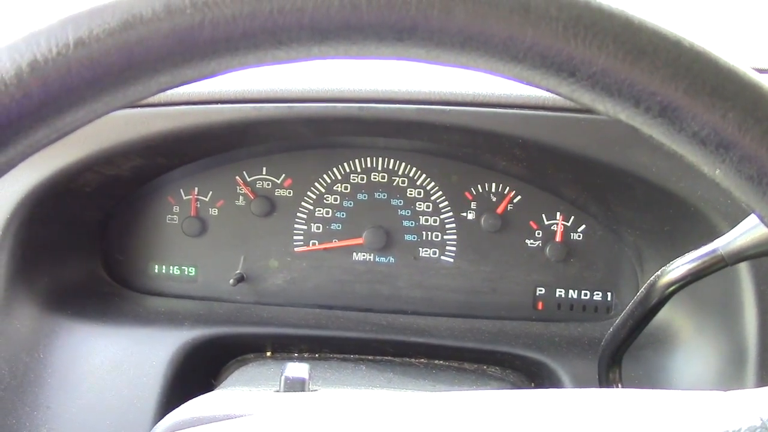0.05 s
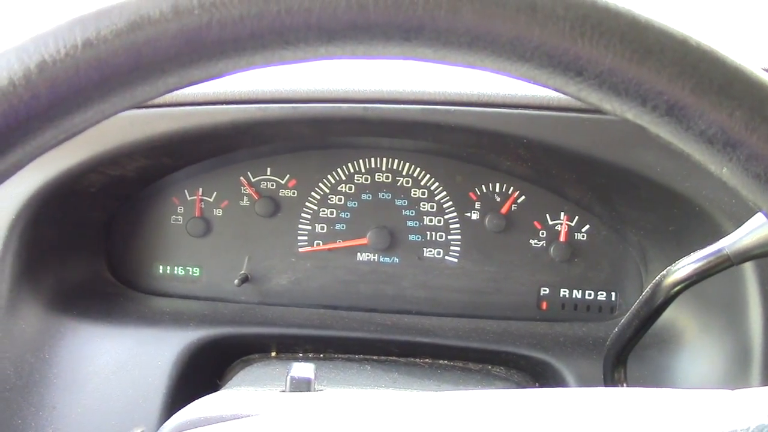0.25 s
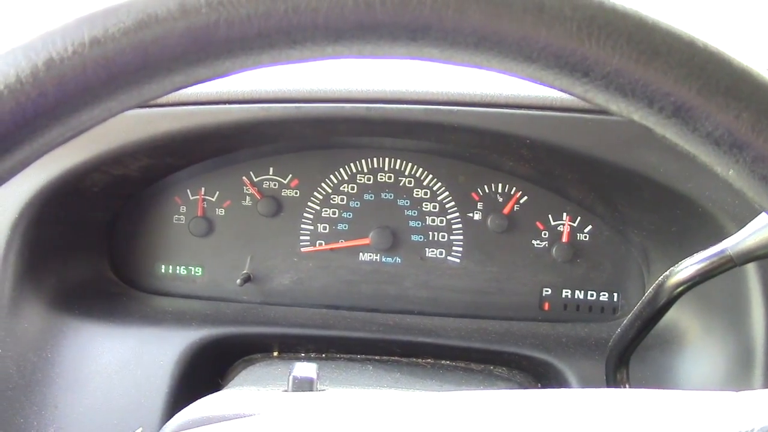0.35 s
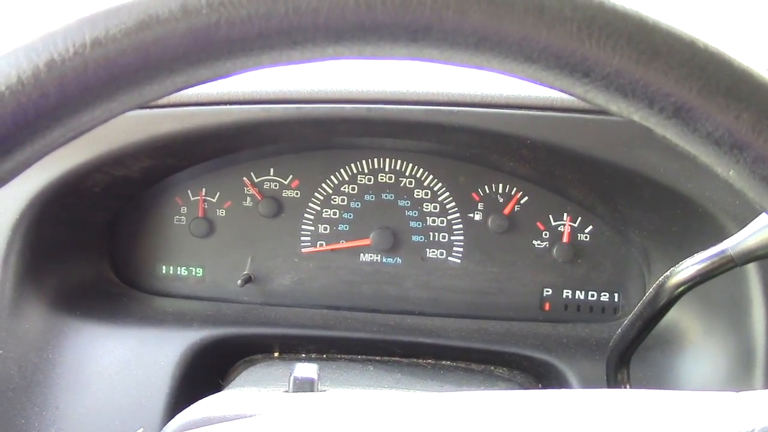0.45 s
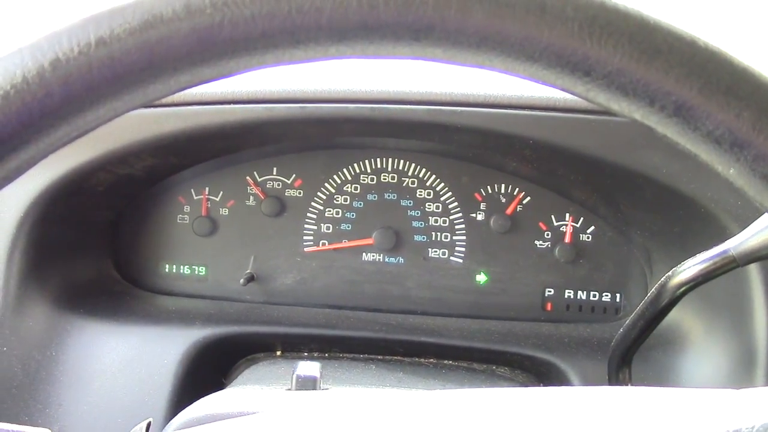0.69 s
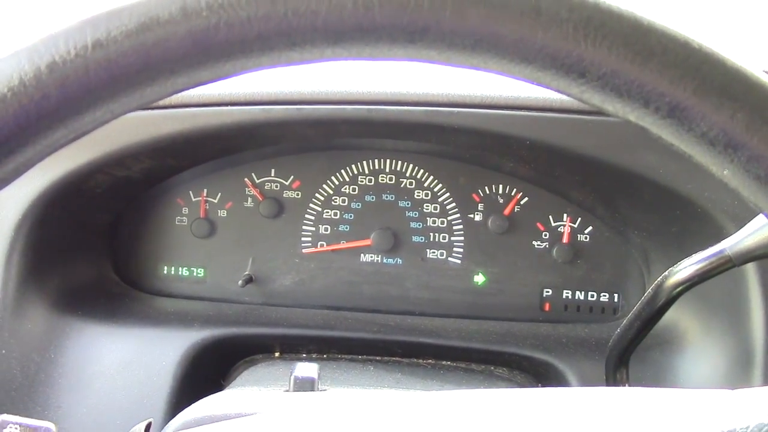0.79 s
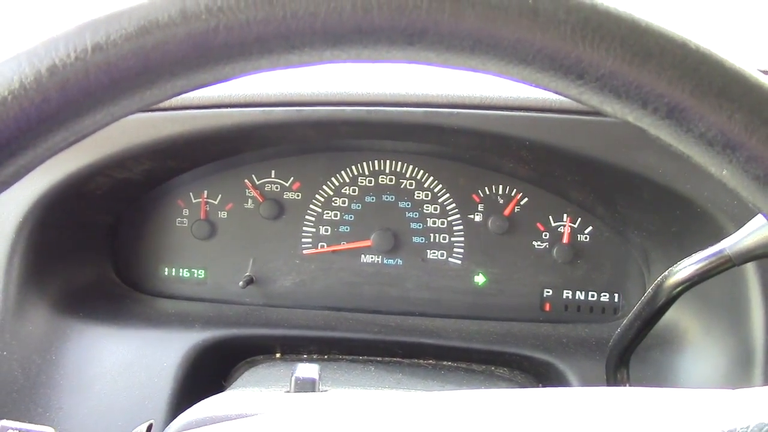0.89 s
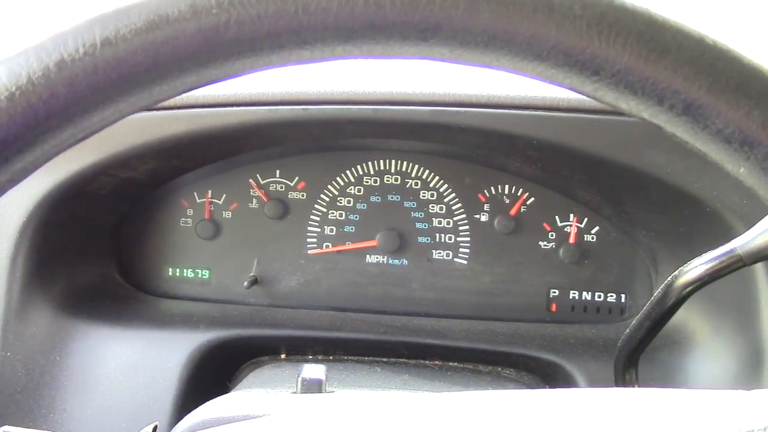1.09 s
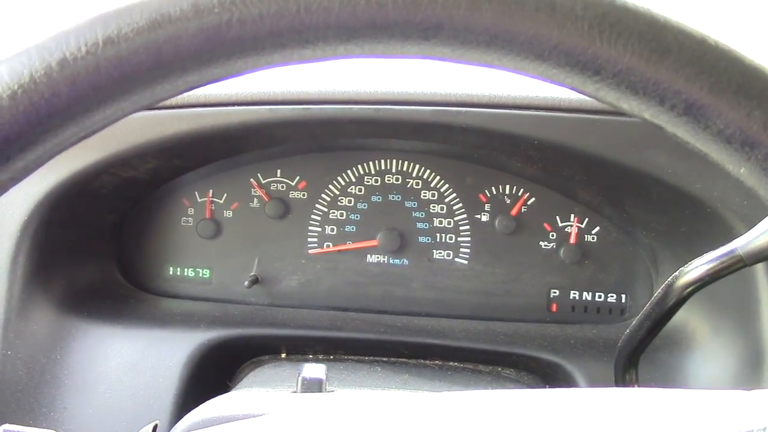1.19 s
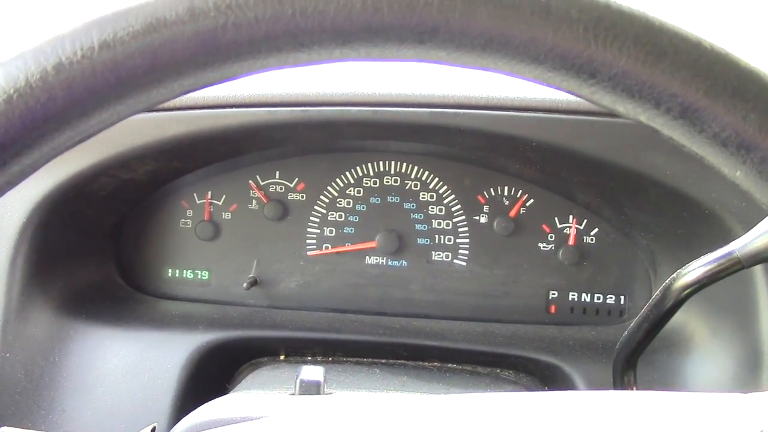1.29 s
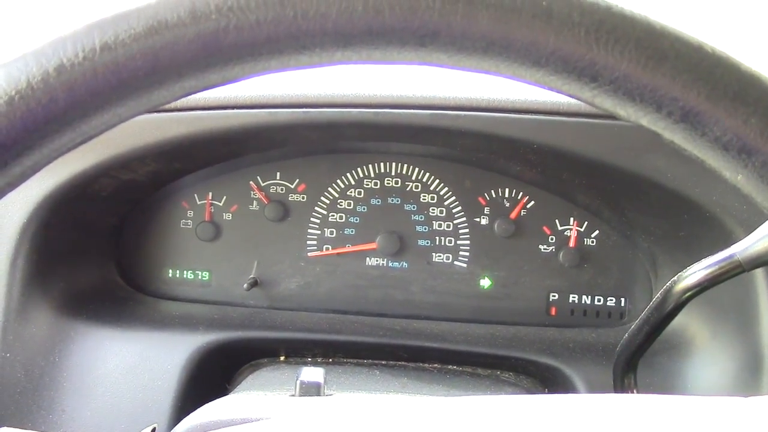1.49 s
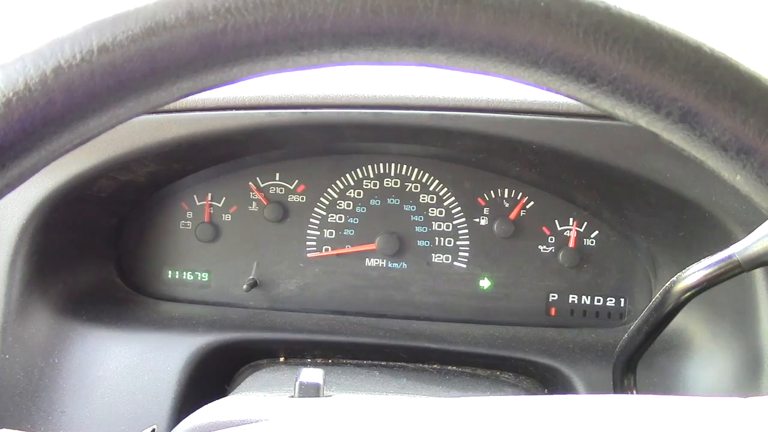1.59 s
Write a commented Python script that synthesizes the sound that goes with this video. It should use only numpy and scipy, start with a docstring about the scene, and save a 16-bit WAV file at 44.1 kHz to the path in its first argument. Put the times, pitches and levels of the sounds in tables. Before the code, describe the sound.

Close by in a small, padded vehicle cabin, a turn signal lever is flicked over: one loud clack, light clicks, and a duller second clack. A few faint relay ticks sound over a soft rush and low hum.

```python
"""A quiet steady rush and a low hum fill the small, padded cabin of a parked vehicle.
The turn signal lever snaps out of the left position and is pushed into the right one: its plastic
catch clacks in the steering column, the switch contacts click, and the flasher relay ticks under
the dash. Each hit is a short crack of noise, the ringing of the part and a brief cabin echo."""
import sys
import numpy as np
from scipy import signal
from scipy.fft import rfft, irfft
from scipy.io import wavfile
from scipy.ndimage import uniform_filter1d

SR = 44100
rng = np.random.default_rng(int(sys.argv[2]) if len(sys.argv) > 2 else 0)


def persist_wave(psi):
    """Save psi, clipped to +-1, as 16-bit WAV."""
    counts = np.round(np.clip(psi, -1, 1) * 32767).astype(np.int16)
    wavfile.write(sys.argv[1], SR, np.atleast_2d(counts).T)


N = 72765

# how alike a click is in the two ears: f/Hz, likeness (1 = the same)
CLICK_LIKENESS = [(200, 0.94), (700, .95), (1500, .8), (3100, 0.87), (6800, 0.46), (12000, 0.3)]


def amp(db):
    """Turns decibels into a factor to multiply by."""
    return 10 ** (np.asarray(db) / 20)


def value_at(curve, hz):
    """Looks up a curve at hz, joining its points on a log-frequency axis."""
    point_hz, values = np.transpose(curve)
    return np.interp(np.log(hz + 1), np.log(point_hz), values)


def pan(left_db):
    """Left and right gains, with the left louder by left_db."""
    return amp([[left_db / 2], [-left_db / 2]])


def noise_pair(likeness, size):
    """Frequencies and spectra of a left and a right white noise that are partly alike."""
    hz = np.fft.rfftfreq(size, 1 / SR)
    left, other = rfft(rng.standard_normal((2, size)))
    same = np.clip(value_at(likeness, hz), -1, 1)
    right = same * left + np.sqrt(1 - same ** 2) * other
    return hz, np.array([left, right])


def coloured(sound, gain_db):
    """Turns each frequency up or down without smearing sound ahead of a hit (minimum phase)."""
    cepstrum = irfft(np.log(amp(gain_db)))
    half = cepstrum.shape[-1] // 2
    cepstrum[..., 1:half] *= 2
    cepstrum[..., half + 1:] = 0
    return irfft(rfft(sound) * np.exp(rfft(cepstrum)))


def flattened(burst):
    """Evens out the broad spectrum of a burst and keeps its fine ripple."""
    power = uniform_filter1d(abs(rfft(burst)) ** 2, size=90, axis=-1)
    return coloured(burst, -10 * np.log10(abs(power) + 1e-12))


def cabin_air():
    """Shaped noise makes the steady rush, and one faint tone makes the low hum."""
    # tone colour of the rush: f/Hz, relative level/dB
    colour = [(25, -23), (43, -34), (59, -14), (123, -13), (161, -4), (205, -3), (291, 2), (361, -7),
              (449, -0.5), (600, 1), (680, -0.5), (750, -8), (905, -6), (1070, -4.5), (1280, -10.5),
              (1470, -6.5), (2460, -12), (4500, -14), (5300, -14), (6310, -15), (7500, -21.5),
              (9500, -22.5), (12500, -30), (15800, -41)]
    # how alike the rush is in the two ears: f/Hz, likeness
    likeness = [(40, 0.89), (200, .88), (600, 0.53), (1500, 0.3), (4000, 0.59), (12000, 0.29)]
    rush_db, hum_db, hum_hz = -51.5, -76.5, 71.6
    hz, noise = noise_pair(likeness, N)
    rush = irfft(noise * amp(value_at(colour, hz)), N)
    hum = np.sqrt(2) * np.sin(2 * np.pi * (hum_hz * np.arange(N) / SR + rng.random()))
    return pan(left_db=0.8) * (amp(rush_db) * rush / rush.std() + amp(hum_db) * hum)


def cabin_echo(t):
    """Many reflections blur into a short tail; the treble dies first."""
    # how long the cabin echoes: f/Hz, time to fade by 60 dB/s
    fade_times = [(250, 0.46), (700, 0.19), (2000, 0.067), (5000, 0.073), (12000, 0.044)]
    band_count, rise_s = 7, 0.0011
    hz, noise = noise_pair(CLICK_LIKENESS, len(t))
    centres = np.geomspace(200, 13000, band_count)
    tail = 0
    for centre_hz, weights in zip(centres, np.eye(band_count)):
        band = irfft(noise * value_at(list(zip(centres, weights)), hz))
        tail += band * amp(-60 * t / value_at(fade_times, centre_hz))
    return flattened(tail * (1 - np.exp(-t / rise_s)))


def strikes(hits, colour, tones, crack_fade_s, ring_db, echo_db):
    """Each hit cracks, rings the part and echoes. A fade is the time to fall by 60 dB."""
    crack_rise_s, ring_rise_s = 0.00015, 0.00039
    bass_hz, treble_hz, lowest_hz = 1080, 5040, 248
    size = 8192  # samples in one hit
    t = np.arange(size) / SR
    track = np.zeros((2, N + size))
    for start_s, level_db, bass_db, treble_db, extra_ring_db, extra_echo_db in hits:
        hz, noise = noise_pair(CLICK_LIKENESS, size)
        crack = flattened(irfft(noise) * amp(-60 * t / crack_fade_s) * (1 - np.exp(-t / crack_rise_s)))
        echo = amp(echo_db + extra_echo_db) * cabin_echo(t)
        hit = coloured(crack + echo, value_at(colour, hz))
        ring_onset = amp(ring_db + extra_ring_db) * (1 - np.exp(-t / ring_rise_s))
        for tone_hz, tone_db, fade_s in tones:
            # each ear gets the tone a little out of step
            shift = rng.standard_normal((2, 1)) * (1 - value_at(CLICK_LIKENESS, tone_hz)) / np.pi
            envelope = ring_onset * amp(tone_db - 60 * t / fade_s)
            hit += envelope * np.sin(2 * np.pi * (tone_hz * t + shift))
        bass_shelf = bass_db / (1 + (hz / bass_hz) ** 4)
        treble_shelf = treble_db / (1 + (treble_hz / (hz + 1)) ** 4)
        start = round(start_s * SR)
        track[:, start:start + size] += coloured(hit, level_db + bass_shelf + treble_shelf)
    # the hits carry almost no deep bass
    low_cut = signal.butter(6, lowest_hz, "highpass", fs=SR, output="sos")
    return signal.sosfilt(low_cut, track[:, :N])


def lever():
    """The lever's catch rides over a bump and slaps home in the steering column housing."""
    # hits of the catch: t/s, level/dB, bass/dB, treble/dB, extra ring/dB, extra echo/dB
    hits = [(.2422, -27.5, 12.5, -6, -18, 14), (.2461, -12.5, -3, 13, 4.5, 3), (.2513, 3, -13, -2, -2, -3),
            (.2545, -1.5, -1.5, 5, 6, 0), (.2590, -3, 4.5, 3.5, -17.5, -1),
            (.7308, -13, 11, -5.5, -0.5, -0.5), (.7338, -11.5, -3.5, -4.5, 3.5, -1),
            (.7388, -9, 4.5, 0, -16, -4), (.7412, -6.5, -2, -6, -5.5, -19),
            (.7705, -21.5, 13.5, -18, -15, -18), (.7905, -24, 7.5, -34, -5, -6)]
    # tone colour of the crack and its echo: f/Hz, level/dB
    colour = [(100, -36), (200, -33), (270, -4.5), (800, -2), (1900, -2.5), (3000, 4.5), (4300, 1.5),
              (6500, -5), (9500, -7), (12000, -17), (15500, -34)]
    # ringing tones of the housing: f/Hz, level/dB, fade/s
    tones = [(262, -19, .2), (298, -17, .24), (324, -19, .18), (495, -16, .11), (798, -7, .09),
             (1072, -10, .08), (1589, -2, .07), (2459, -1, .06), (2728, -2, .06), (2813, -3, .06),
             (2968, -1, .055), (3065, -1, .055), (3189, 4, .05), (3408, -2, .05), (3634, -4, .05),
             (4258, -3, .05), (5429, -3, .05), (5850, -3, .045), (6360, -6, .05)]
    clacks = strikes(hits, colour, tones, crack_fade_s=0.014, ring_db=-36, echo_db=-3)
    return amp(8) * pan(left_db=1.7) * clacks


def contacts():
    """Small sliding switch contacts drop into place and ring their holder."""
    # light hits of the contacts: t/s, level/dB, bass/dB, treble/dB, extra ring/dB, extra echo/dB
    hits = [(.3345, -17, -9, -27, -12, 1.5), (.4915, -16, 9, -14, 0, 3), (.5432, -23.5, -16, -2.5, 4, 4),
            (.6044, -11, -1.5, 2, 6.5, 0), (.8715, -26, 2, -12, 4.5, -7), (.9350, -20, 3, -38, -2, 12.5),
            (.9380, -23, -4, 9, 0, -7), (.9402, -14, -2, 3.5, 8, -5)]
    # tone colour of the crack and its echo: f/Hz, level/dB
    colour = [(150, -18.5), (350, -12), (800, 2), (1400, -3), (3300, 6.5), (4200, 1), (6000, -1),
              (8600, -2.5), (10500, -14), (15500, -31)]
    # ringing tones of the holder: f/Hz, level/dB, fade/s
    tones = [(850, -8, .07), (1860, -8, .06), (3200, 1, .018), (3520, 2, .03), (5440, -5, .035),
             (6170, -9, .035), (7720, -8, .03), (8600, -8, .025)]
    clicks = strikes(hits, colour, tones, crack_fade_s=0.011, ring_db=-35, echo_db=-8.5)
    return amp(7.5) * pan(left_db=2.2) * clicks


def relay():
    """The relay's moving arm hits its stop and rings the case around it."""
    # hits and bounces of the arm: t/s, level/dB, bass/dB, treble/dB, extra ring/dB, extra echo/dB
    hits = [(.5547, -16.5, -13, -23, -2, 6.5), (.5574, -17.5, 1, 2, 0.5, -2),
            (1.0173, -26.5, 10.5, 8.5, 1.5, 0), (1.3475, -20, -14, -0.5, 2.5, -5),
            (1.3488, -20.5, -7, 0, -2.5, 0)]
    # tone colour of the crack and its echo: f/Hz, level/dB
    colour = [(150, -13), (600, -2), (1000, -3), (2300, 3), (4500, 1.5), (5300, 6), (6300, 6), (7000, -5.5),
              (9000, -3.5), (13000, -9.5), (15500, -29)]
    # ringing tones of the frame and case: f/Hz, level/dB, fade/s
    tones = [(780, -19, .25), (1550, -12, .06), (2350, -9, .07), (3470, -12, .04), (5130, -1, .035),
             (5280, 10, .012), (5450, -2, .03), (5930, 2, .014), (6190, -3, .04), (6420, -5, .045),
             (7780, -9, .04), (8400, -9, .03)]
    ticks = strikes(hits, colour, tones, crack_fade_s=0.012, ring_db=-23, echo_db=-3)
    return amp(7) * pan(left_db=3.0) * ticks


def scene():
    """Lever, contacts and relay over the cabin's rush and hum."""
    return lever() + contacts() + relay() + cabin_air()


def record(dry):
    """Cuts away the very highest treble."""
    cutoff_hz = 15850
    high_cut = signal.firwin(511, cutoff_hz, window=("kaiser", 9), fs=SR)
    return signal.oaconvolve(dry, high_cut[None], "same")


dry = scene()
out = record(dry)
persist_wave(out)
```